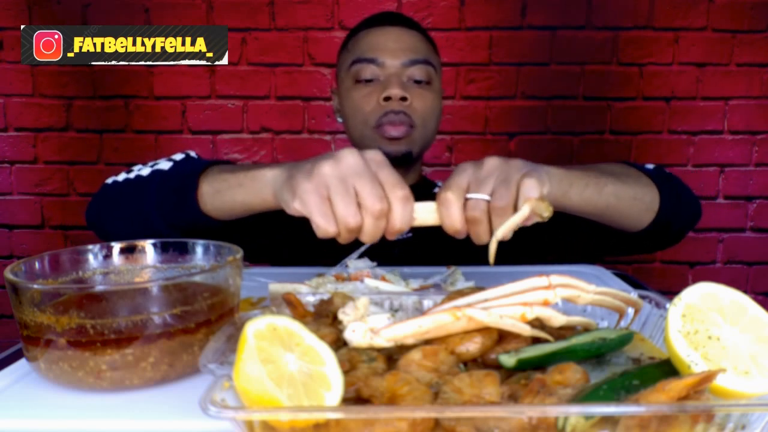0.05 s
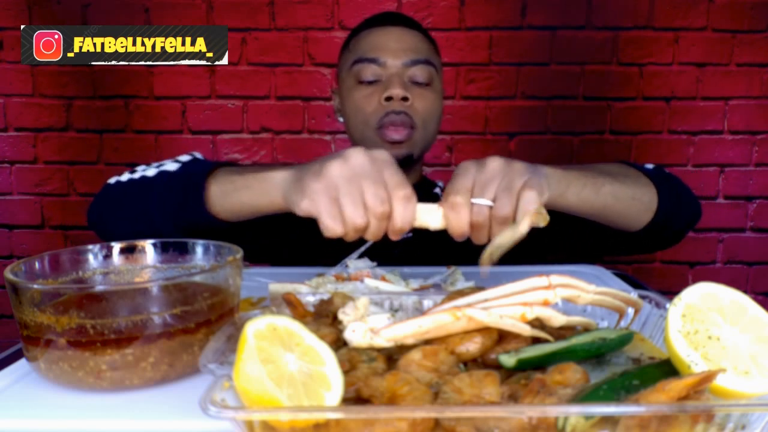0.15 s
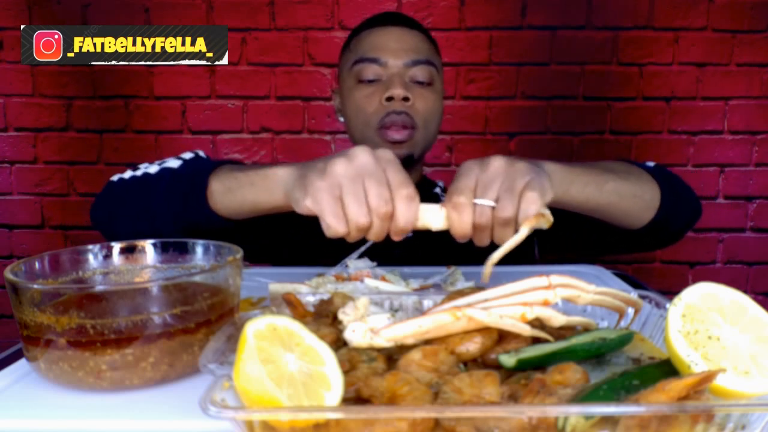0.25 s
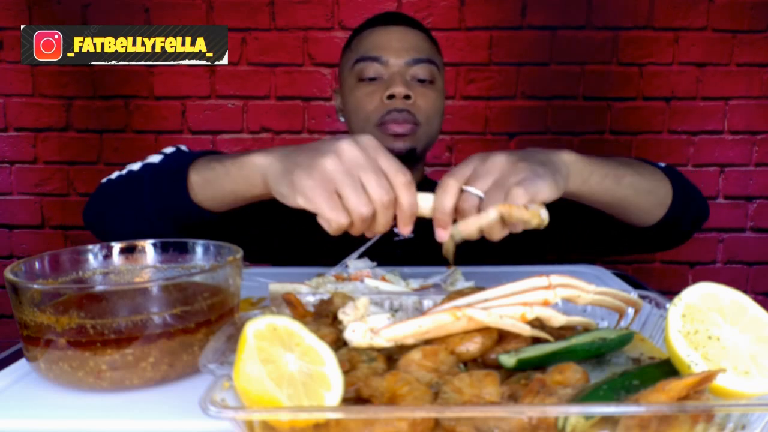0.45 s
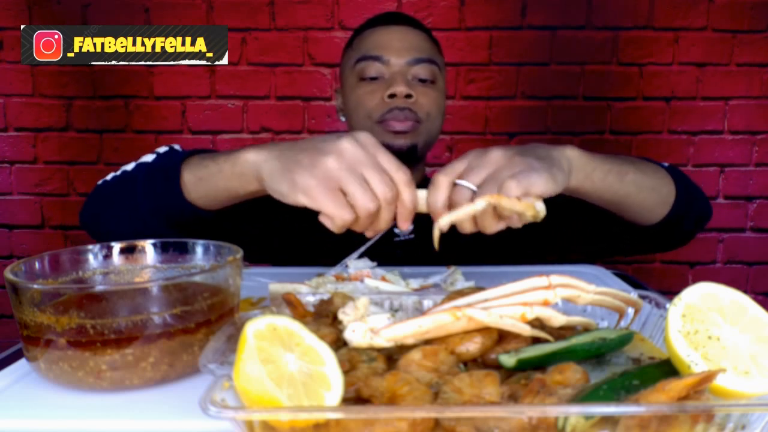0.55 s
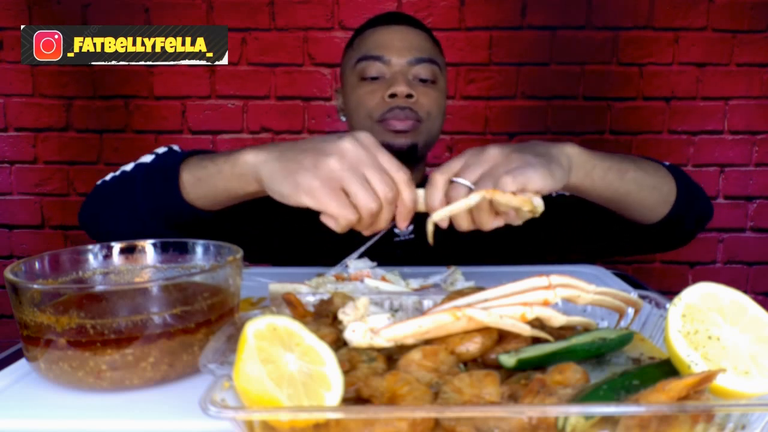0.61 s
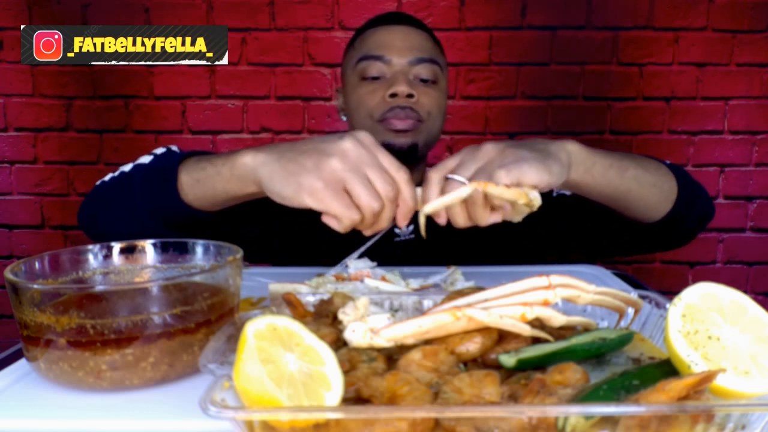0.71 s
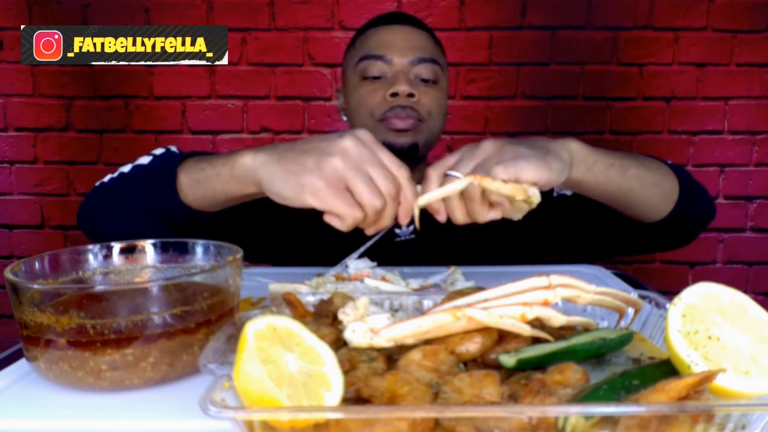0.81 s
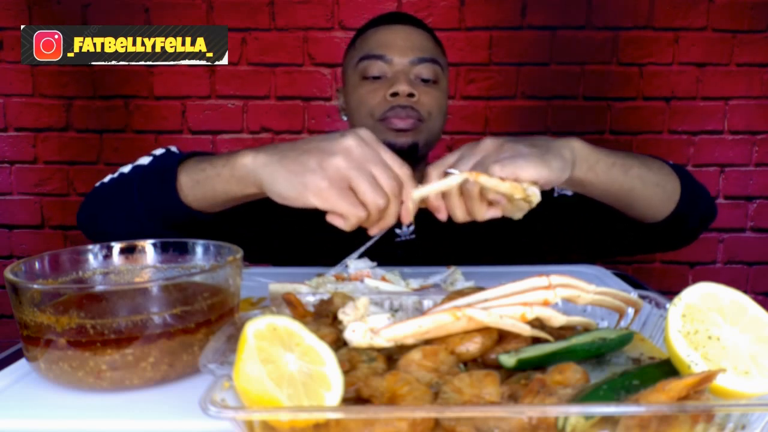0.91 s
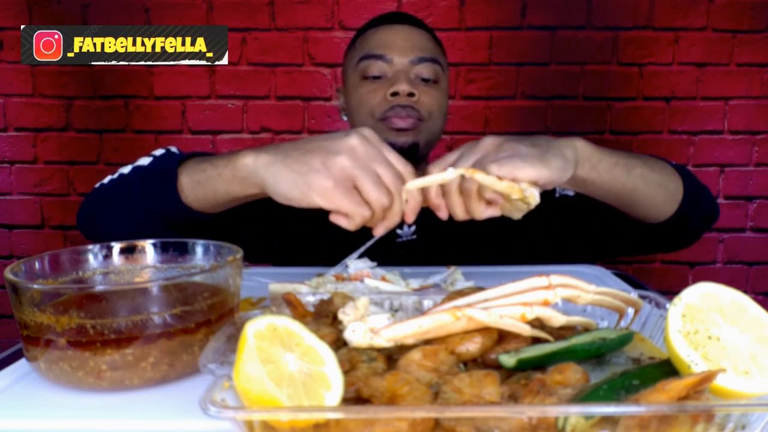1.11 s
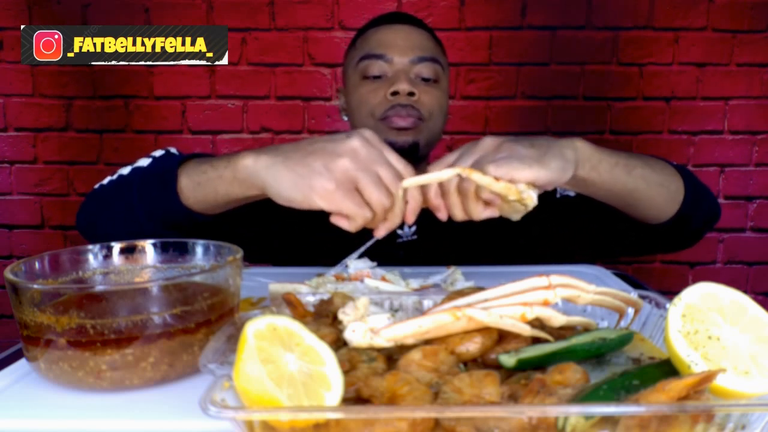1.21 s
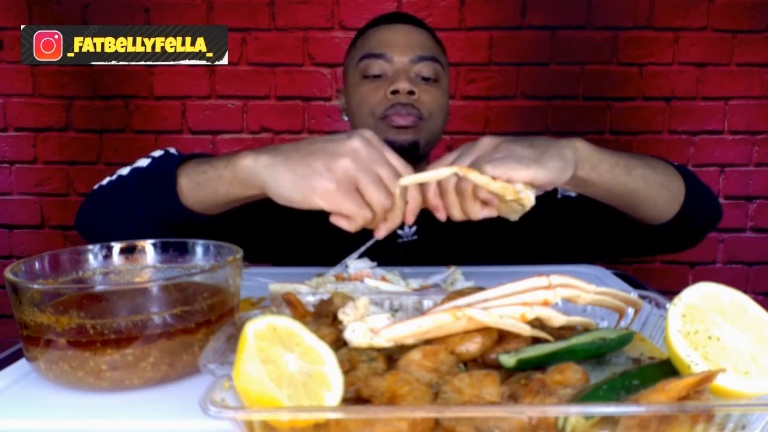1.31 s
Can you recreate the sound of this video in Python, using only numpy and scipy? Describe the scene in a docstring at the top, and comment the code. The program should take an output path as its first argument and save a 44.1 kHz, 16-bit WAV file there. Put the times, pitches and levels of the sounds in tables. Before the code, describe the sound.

Crab shell cracking close up: a small crack, then one loud thin snap with bright echo

```python
"""Small hard-walled room, a crab leg bent near the microphone: a small crack, a dull give, then a loud
thin snap that rings off table, bowl and walls; a faint tick follows later. Each crack is a roughened
high sine over clicked shell modes, the give a damped sine; single echoes, scatter and a reverberation
tail answer the cracks. Shaped noise lies under it as steady low rumble and hiss."""
import sys
import numpy as np
from scipy import signal
from scipy.fft import rfft, irfft
from scipy.io import wavfile

SR = 44100
rng = np.random.default_rng(int(sys.argv[2]) if len(sys.argv) > 2 else 0)


def output_pcm(signal):
    """Save a mono or channel-first signal as 16-bit PCM at the path in sys.argv[1].

    Samples are clipped to [-1, 1] before scaling.
    """
    pcm = np.clip(np.atleast_2d(signal).T, -1, 1) * 32767
    wavfile.write(sys.argv[1], SR, np.round(pcm).astype(np.int16))


N = 59535
RING_HZ = 8160  # the thin high ring of a crack, blurred again in its echoes


def amp(db):
    """Level in dB to amplitude."""
    return 10 ** (np.asarray(db) / 20)


def read(points, hz):
    """Value of a table at the given frequencies, read along a log frequency axis."""
    f, value = np.transpose(points)
    return np.interp(np.log(hz + 1), np.log(f + 1), value)


def add(mix, s, sound):
    """Lay a sound into the mix from s seconds on, cut at the end of the mix."""
    part = mix[round(s * SR):][:len(sound)]
    part += sound[:len(part)]


def causal(points, size=2048):
    """Minimum-phase impulse with the given colour and energy 1."""
    hz = abs(np.fft.fftfreq(size, 1 / SR))
    log_gain = np.log(amp(np.maximum(read(points, hz), -90)))
    # the Hilbert transform of the log gain gives the minimum phase
    taps = np.fft.ifft(np.exp(np.conj(signal.hilbert(log_gain)))).real[:size // 2]
    return taps / np.linalg.norm(taps)


def shaped(x, points):
    """Zero-phase filter from a table of f/Hz, level/dB."""
    return irfft(rfft(x) * amp(read(points, np.fft.rfftfreq(N, 1 / SR))), N)


def sparse(channels):
    """One second of scattered reflections: one tap of random sign in every 20 samples."""
    taps = np.zeros((channels, SR))
    slots = np.arange(0, SR - 20, 20)
    at = slots + rng.integers(0, 20, (channels, len(slots)))
    np.put_along_axis(taps, at, rng.choice([-1., 1.], at.shape), 1)
    return taps


def snap(level_db, length, click_db, tilt_db, chance):
    """A click and crackle ring the shell as it breaks; a thin high ring lasts while the crack runs."""
    # short modes of the hollow shell, rung by each click: f/Hz, level/dB before the tilt, t60/s
    shell_modes = [(457, -16.5, .015), (753, -13.5, .012), (1390, -5, 0.011), (2000, -8.5, .01),
                   (2750, -15.5, 0.014), (3340, -5, 0.0055), (4618, -11, 0.014), (5290, -1.5, .012),
                   (5800, -4.5, .01), (6460, -1, 0.013), (7385, -0.5, .005)]
    ring_width_hz, ring_rough = 760, 0.067
    rise_s, ring_fall_s = .0001, .0004  # the fall is a time constant, after the crack has run
    click_base_db = -13.5
    crackle_db = -13.5  # small breaks that keep striking the shell while the crack runs
    t = np.arange(len(chance)) / SR

    # slow random wobble of the ring's strength, which widens its line
    r = np.exp(-np.pi * ring_width_hz / SR)
    wobble = signal.lfilter([np.sqrt(1 - r * r)], [1, -r], chance)
    shape = np.minimum(t / rise_s, 1) * np.exp(-np.maximum(t - length, 0) / ring_fall_s)
    ring = shape * (1 + ring_rough * wobble) * np.sin(2 * np.pi * RING_HZ * t)

    body = np.zeros(len(t))
    for hz, db, t60 in shell_modes:
        mode_db = db + tilt_db * np.log2(hz / RING_HZ) - 60 * t / t60
        body += amp(mode_db) * np.sin(2 * np.pi * hz * t)

    # one first click, then the crackle
    strikes = (t == 0) + amp(crackle_db) * shape * chance[::-1]
    struck = np.convolve(strikes, body)[:len(t)]
    return amp(level_db) * (ring + amp(click_base_db + click_db) * struck)


def knock():
    """The shell gives with a short dull knock, a damped sine, just before it breaks."""
    start_s, level_db, hz, t60_s = .2192, -33, 1050, .012
    t, out = np.arange(800) / SR, np.zeros(N)
    add(out, start_s, amp(level_db - 60 * t / t60_s) * np.sin(2 * np.pi * hz * t))
    return out


def early(clicks):
    """Single echoes, each a click with a short blur of the ring, over a quickly dying scatter."""
    # single echoes from table, bowl and walls: delay t/s, level/dB before the common echo level
    echoes = [(.0052, -6), (.0069, -7), (.0083, -9), (.0122, -15), (.0148, -9), (.0182, -11), (.0203, -12),
              (.0243, -13), (.0285, -11), (.0345, -14), (.0402, -14), (.0472, -11), (.0562, -8),
              (.0690, -16)]
    # colour of one echo and of the scatter: f/Hz, relative level/dB per Hz
    echo_colour = [(180, -45.5), (300, -24), (637, -32.5), (2650, -19), (3270, -21), (3920, -18),
                   (7060, -7), (8050, -3), (9030, -32.5), (12500, -46), (15000, -89)]
    # filter over all early sound, falling away at the top: f/Hz, level/dB
    echo_top = [(100, 1.5), (9000, 1), (12500, -4.5), (13500, -29.5), (16000, -32)]
    scatter_db, scatter_t60_s, scatter_start_s = 12, 0.16, .002
    echo_db = 6
    blur_db, blur_s = 5, .0012  # level against the echo's click; the blur peaks at half this time

    t, colour = np.arange(SR) / SR, causal(echo_colour)
    scatter = sparse(channels=1)[0] * amp(-60 * t / scatter_t60_s) * (t > scatter_start_s)
    scatter /= np.linalg.norm(scatter)

    echo_t = t[:len(colour)]
    u = echo_t / blur_s
    blur = u * np.exp(-2 * u) * np.sin(2 * np.pi * RING_HZ * echo_t)
    echo = colour + amp(blur_db) * blur / np.linalg.norm(blur)

    response = signal.fftconvolve(amp(scatter_db) * scatter, colour)
    for delay, db in echoes:
        add(response, delay, amp(echo_db + db) * echo)
    return shaped(signal.fftconvolve(clicks, response)[:N], echo_top)


def late(clicks):
    """Reverberation that builds up, each band dying at its own speed."""
    # colour of the reverberation: f/Hz, relative level/dB per Hz
    late_colour = [(240, -51), (400, -21), (633, -24.5), (1400, -27.5), (1760, -20.5), (2060, -24.5),
                   (2470, -20.5), (4280, -16), (8150, -1), (13900, -28.5), (15500, -53.5)]
    # decay of the room before the treble bend: f/Hz, t60/s
    room_decay = [(500, 1.0), (1000, .9), (2000, .8), (5000, 0.67), (8200, 0.61), (11000, .42),
                  (15000, 0.26)]
    # likeness of left and right: f/Hz, likeness (0-1)
    late_same = [(4000, 1), (9000, 1), (10500, .8), (12000, 0), (15000, 0.05)]
    level_db, start_s, rise_s = -24, 0.016, 0.028
    # the treble fade steepens towards its end, in full from bend_hz up
    bend_db_per_s2, bend_hz = -200, 5000

    hz, t, (a, b) = signal.stft(sparse(channels=2), SR, nperseg=256)
    band = hz[:, None]
    same = np.clip(read(late_same, band), 0, 1)
    mid = a * np.sqrt((1 + same) / 2)
    side = b * np.sqrt((1 - same) / 2)

    rise = np.clip((t - start_s) / rise_s, 0, 1)
    bend = amp(bend_db_per_s2 * t ** 2 * np.minimum(band / bend_hz, 1))
    decay = amp(read(late_colour, band) - 60 * t / read(room_decay, band))
    bands = np.array([mid + side, mid - side]) * rise * bend * decay
    tail = signal.istft(bands, SR, nperseg=256)[1]
    tail /= np.std(tail[0, :SR // 10])  # level set by the first 0.1 s on the left
    return amp(level_db) * signal.fftconvolve(clicks[None], tail, axes=1)[:, :N]


def floor():
    """Steady rumble and hiss from shaped noise, mono in the bass, a little wide in the treble."""
    # colour of the room floor: f/Hz, relative level/dB per Hz
    floor_colour = [(15, 0), (120, -2.5), (250, -7.5), (500, -12.5), (1000, -19), (2000, -27), (4000, -34),
                    (6300, -39), (8500, -38), (10500, -41.5), (13000, -39), (15500, -49)]
    # width of the room floor: f/Hz, side against mid level/dB
    floor_side = [(60, -76), (110, -78), (200, -74), (380, -68.5), (700, -59.5), (1290, -53.5),
                  (2380, -47.5), (4400, -17.5), (8120, -8.5), (15000, -9.5)]
    mid_db = -48.5  # RMS of the mid
    mid = shaped(rng.standard_normal(N), floor_colour)
    side = shaped(shaped(rng.standard_normal(N), floor_colour), floor_side)
    return amp(mid_db) / np.std(mid) * np.array([mid + side, mid - side])


def scene():
    """Near cracks and knock, their echoes and reverberation lean in stereo over the room floor."""
    # cracks of the leg: t/s, level/dB before the near filter, length of the running crack/s,
    # first click against the ring/dB before the base click level, its tilt/dB per octave,
    # share sent to the room/dB
    snaps = [(0.1819, -21.5, 0.00101, 4.5, 3, -1.5), (0.2295, -3.5, 0.0019, -4, 0.5, -1.5),
             (1.1657, -65, .0005, 15, -2, -3), (1.2231, -44, 0.0011, 7, 14, -6.5)]
    # filter over the near sound, falling away steeply above the ring: f/Hz, level/dB
    near_top = [(100, -7.5), (8500, 1), (8900, -30.5), (12000, -38), (13000, -56.5), (16000, -55.5)]
    # left minus right of the leg and its room: f/Hz, level/dB; half goes to each side
    lean = np.array([(3000, 0.5), (5000, 1.9), (8200, 1.3), (11000, -1.5), (15000, 5.5)]) * [1, .5]

    near, clicks = knock(), np.zeros(N)
    chances = rng.standard_normal((len(snaps), 900))
    for (s, db, length, click_db, tilt_db, room_db), chance in zip(snaps, chances):
        add(near, s, snap(db, length, click_db, tilt_db, chance))
        add(clicks, s, [amp(db + room_db)])  # the room hears each crack as one click

    left, right = shaped(near, near_top) + early(clicks) + late(clicks)
    leg = np.array([shaped(left, lean), shaped(right, lean * [1, -1])])
    return leg + floor()


def record(dry):
    """Band limit of the recorder: a steep linear-phase low-pass."""
    edge_hz = 15600
    taps = signal.firwin(511, edge_hz, window=("kaiser", 9), fs=SR)
    return signal.oaconvolve(dry, taps[None], "same")


dry = scene()
out = record(dry)
output_pcm(out)
```